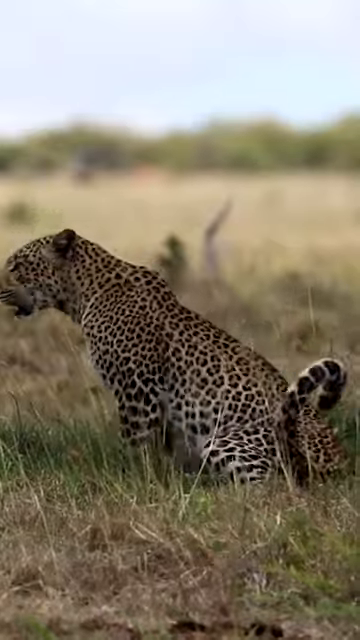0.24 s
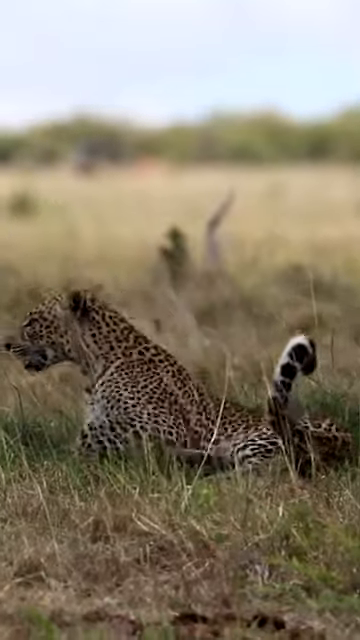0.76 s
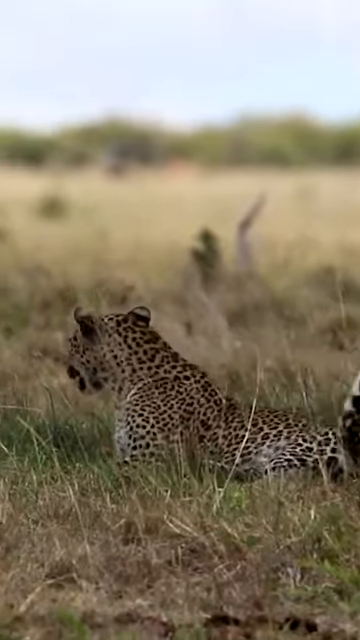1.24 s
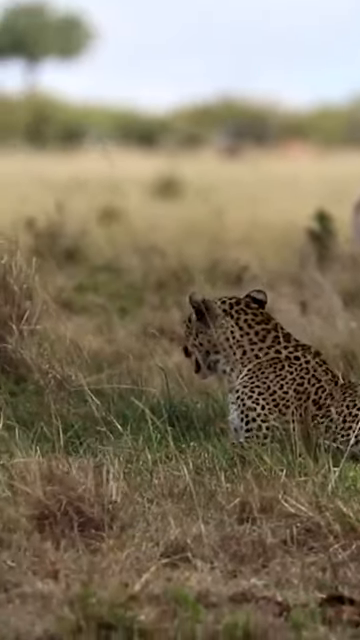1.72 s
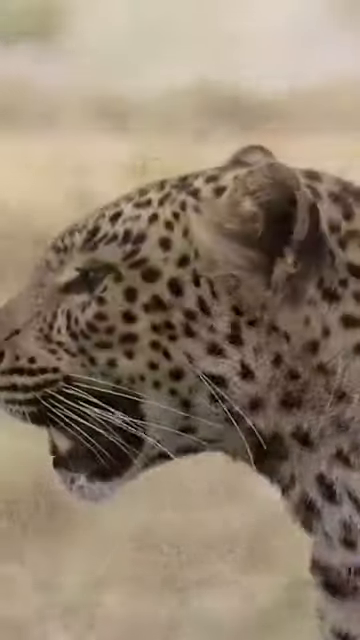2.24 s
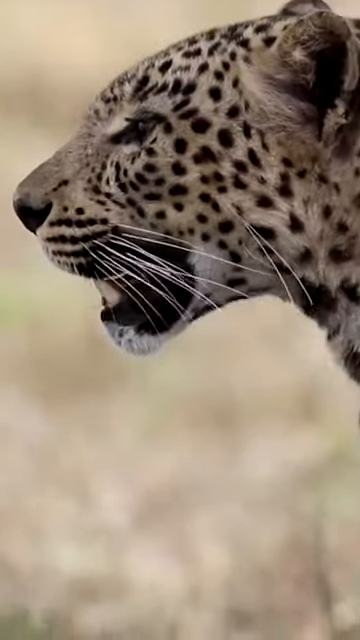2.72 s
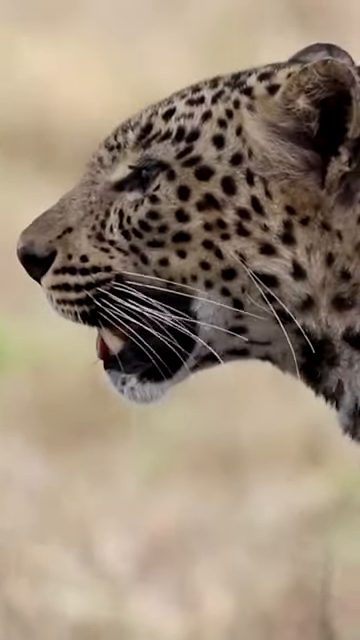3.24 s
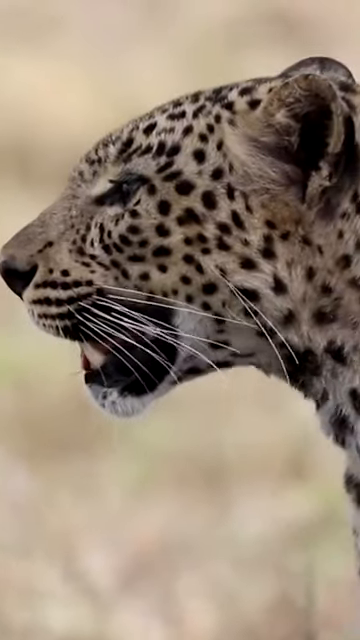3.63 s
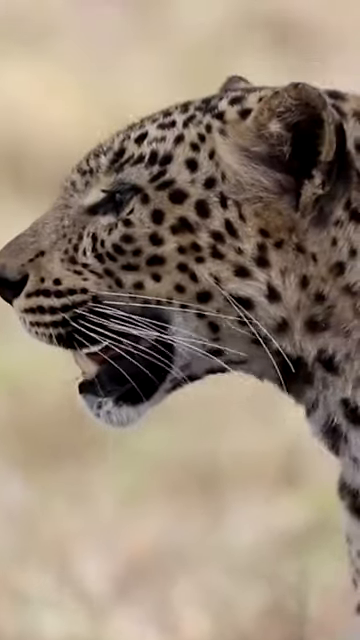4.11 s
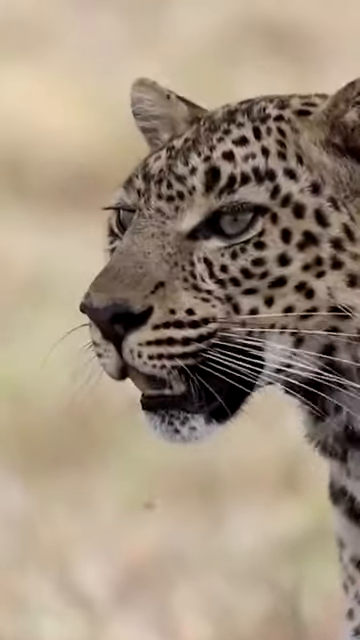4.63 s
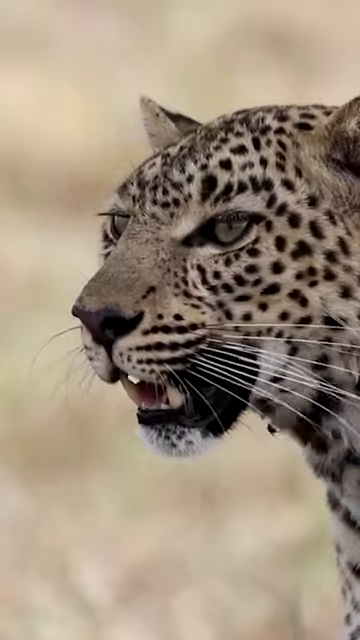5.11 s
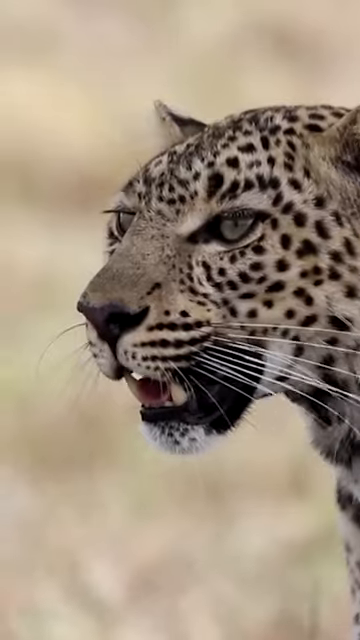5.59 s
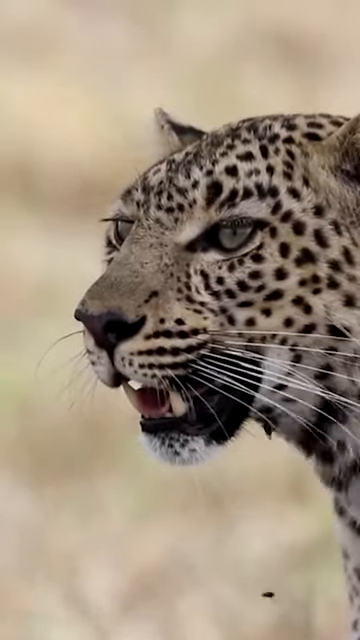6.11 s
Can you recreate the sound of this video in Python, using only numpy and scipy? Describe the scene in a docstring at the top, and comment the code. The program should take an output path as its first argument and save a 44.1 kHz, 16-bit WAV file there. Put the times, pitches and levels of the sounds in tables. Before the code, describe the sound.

A leopard growls low at the start and again late, over faint rumble and hiss, small birds chirping and dry grass ticking in open grassland.

```python
"""Open grassland: a leopard growls twice, slow throat pulses ringing a falling resonance amid thin moans.
Small birds chirp, whistle and tumble in warbled tones with near echoes and a short scattered tail.
Dry stems tick as damped rings with noisy cracks, and a few soft thumps ring low.
Shaped noise makes the low rumble, steady hiss, grass crackle and haze of far birds.
Before the middle the whole sound drops out abruptly, then swells back."""
import sys
import numpy as np
from scipy import signal
from scipy.fft import rfft, irfft
from scipy.io import wavfile
from scipy.ndimage import uniform_filter1d

SR = 44100
rng = np.random.default_rng(int(sys.argv[2]) if len(sys.argv) > 2 else 0)


def store_wav(level_fs):
    """Save 16-bit WAV to argv[1]."""
    pcm = np.round(np.clip(np.atleast_2d(level_fs), -1, 1) * 32767)
    wavfile.write(sys.argv[1], SR, pcm.T.astype(np.int16))


N = 280035  # samples

# Growls, with the swell of the low rumble around each: (time [s], rise [dB])
GROWL_TIMES = [(-.038, 3), (4.8, 2.5)]


def undb(db):
    """Decibels to gain."""
    return 10 ** (np.asarray(db) / 20)


def envelope(t, attack, hold, release):
    """Rise from 0 to 1, hold, fall back to 0."""
    return np.clip(np.minimum(t / attack, 1 - (t - attack - hold) / release), 0, 1)


def clock(seconds):
    """Sample times of a stretch of sound."""
    return np.arange(int(seconds * SR)) / SR


def add(out, start, x):
    """Mix x into out from a start time, trimming whatever falls outside."""
    i = int(round(start * SR))
    x, i = x[max(-i, 0):], max(i, 0)
    out[i:i + len(x)] += x[:max(len(out) - i, 0)]


def walk(rate, size):
    """Smooth random wandering with a spread near 1, from rate fresh values a second."""
    k = int(SR / rate)
    steps = np.repeat(rng.standard_normal(size // k + 1), k)
    smooth = uniform_filter1d(uniform_filter1d(steps, k), k)
    return 1.535 * smooth[:size]


def colour(x, spectrum):
    """Give x a spectrum of (frequency [Hz], level [dB]) points, at rms 1."""
    hz, db = np.transpose(spectrum)
    f = np.maximum(np.fft.rfftfreq(len(x), 1 / SR), 1)
    shape_db = np.interp(np.log(f), np.log(hz), db)
    y = irfft(rfft(x) * undb(shape_db), len(x))
    return y / y.std()


def ring(hz, modes):
    """Damped resonances after a soft push: each swells, then dies away."""
    t = clock(.06)
    out = np.zeros(len(t))
    for multiple, db, swell in modes:
        swell_and_fade = t / swell * np.exp(1 - t / swell)  # peaks at 1
        out += undb(db) * swell_and_fade * np.sin(2 * np.pi * hz * multiple * t)
    return out


def grassland(flutter_db=1.5, waver_db=1.17, rustle_db=-66, chorus_db=-63, chorus_swell_db=3):
    """Wavering shaped noise makes rumble, hiss and far birds; sparse random grains make the grass crackle."""
    # Low rumble: (frequency [Hz], relative density [dB per Hz])
    rumble_spectrum = [(20, -36), (38, -22), (51, -5.5), (63, -13.5), (84, 2), (102, -4), (135, 0),
                       (190, -1.5), (260, -6.5), (350, -12), (500, -20.5), (750, -37.5), (1500, -49)]
    # Steady hiss: (frequency [Hz], relative density [dB per Hz])
    hiss_spectrum = [(200, -3.5), (600, -0.5), (900, 2), (1600, 2), (3200, 0), (4100, -6), (5200, -4),
                     (6900, -4), (7500, -12.5), (10200, -17.5), (10600, -10), (13500, -9.5), (16000, -20)]
    rumble_db, hiss_db = -51.5, -55  # rumble level away from the growls
    lead_s, hold_s, release_s = 1.5, 1.28, 0.15  # the rumble fills out ahead of each growl
    t = np.arange(N) / SR
    fuller_db = np.zeros(N)
    for start, rise_db in GROWL_TIMES:
        fuller_db += rise_db * envelope(t - start + lead_s, lead_s, hold_s, release_s)
    rumble = colour(rng.standard_normal(N), rumble_spectrum)
    rumble = rumble * undb(rumble_db + fuller_db + flutter_db * walk(20, N))
    hiss = colour(rng.standard_normal(N), hiss_spectrum) * undb(hiss_db + waver_db * walk(12, N))
    grains = (rng.random(N) < 60 / SR) * rng.standard_normal(N)  # about 60 a second
    rustle = colour(grains, [(300, -3), (1000, 4), (2500, 2.0), (6500, -11.5), (8000, -32), (15000, -40)])
    chorus = colour(rng.standard_normal(N), [(4000, -31), (5100, 3.5), (6000, -2), (6900, 2.5), (7700, -44)])
    chorus = chorus * undb(chorus_db + chorus_swell_db * walk(5.9, N))
    return rumble + hiss + undb(rustle_db) * rustle + chorus


def growl(jitter=0.0077, scatter_db=0.6, rasp_db=-24):
    """Slack vocal folds slap open about forty times a second; each slap rings the throat and lets out a rasp."""
    # Throat resonances: (multiple of the lowest [ratio], level [dB], time to swell [s])
    throat = [(1, 1.5, 0.0056), (2.1, -19, 0.0026), (2.9, -26, 0.005), (4.9, -21.5, 0.0014)]
    # The folds slacken as a growl goes on: pulses slow down and the resonance sinks
    first_pulse_s, pulse_hz, pulse_sag_hz_per_s, slack_pulse_hz = .0325, 40.7, 23.1, 35.8
    tense_throat_hz, slack_throat_hz, relax_s = 290, 174.7, 0.055
    # A loud push, then a soft rattle that dies away
    push_db, attack_s, push_hold_s, push_release_s = -32, 0.068, 0.12, 0.082
    rattle_db, rattle_release_s = -43.5, 0.34
    rattle_hold_s = push_hold_s + push_release_s
    out, s = np.zeros(SR), first_pulse_s
    for late, size in rng.standard_normal((22, 2)):
        age = s - first_pulse_s
        hz = slack_throat_hz + (tense_throat_hz - slack_throat_hz) * np.exp(-age / relax_s)
        push = undb(push_db) * envelope(s, attack_s, push_hold_s, push_release_s)
        rattle = undb(rattle_db) * envelope(s, attack_s, rattle_hold_s, rattle_release_s)
        add(out, s, max(push, rattle) * undb(scatter_db * size) * ring(hz, throat))
        s += (1 + jitter * late) / max(pulse_hz - pulse_sag_hz_per_s * age, slack_pulse_hz)
    rasp_spectrum = [(100, -27), (450, 21), (950, 0), (1400, -20), (3000, -14), (8000, -60)]
    rasp = colour(rng.standard_normal(len(out)), rasp_spectrum)
    loudness = np.abs(signal.hilbert(out))  # the rasp follows the pulses
    return out + undb(rasp_db) * loudness * rasp


def moan(jitter=0.0064, shimmer_db=0.05, half_db=-12, waver_db=1.04):
    """Wavering notes open the growl and linger after it, with a rough undertone and a separate whine above."""
    # Notes, timed from the growl's start:
    # (time [s], attack [s], hold [s], release [s], pitch [Hz], level [dB])
    notes = [(0.011, 0.0216, 0.017, 0.032, 259, -38.5), (0.194, 0.11, 0.393, 0.12, 251.8, -48.5),
             (0.797, .09, .19, .2, 261, -46.5), (1.12, 0.02, .008, .03, 249.7, -44)]
    # Thin whine, timed from the growl's start: (time [s], pitch [Hz], level [dB])
    whine = [(.02, 345, -55.5), (.08, 595, -61), (.26, 520, -60), (.3, 450, -67.5), (.55, 410, -66.5),
             (.76, 355, -61), (1.04, 468, -66), (1.14, 450, -62.5), (1.25, 420, -95)]
    swell_db_per_s = 21.5  # up to the end of a note's hold
    sag_hz_per_s = 232  # while a note fades
    t = clock(1.8)

    def turn(hz):
        """Phase of an unsteady pitch."""
        return 2 * np.pi * np.cumsum(hz * (1 + jitter * walk(69.9, len(t)))) / SR

    whine_s, whine_hz, whine_db = np.transpose(whine)
    voice = undb(np.interp(t, whine_s, whine_db)) * np.sin(turn(np.interp(t, whine_s, whine_hz)))
    for start, attack, hold, release, hz, db in notes:
        past_peak = t - start - attack - hold
        phase = turn(hz - sag_hz_per_s * np.clip(past_peak, 0, release))
        undertone = undb(half_db) * walk(39.77, len(t)) * np.sin(phase / 2)  # an octave below
        gain = undb(db + swell_db_per_s * np.minimum(past_peak, 0))
        gain = gain * envelope(t - start, attack, hold, release)
        voice = voice + gain * (np.sin(phase) + undertone)
    unsteady_db = shimmer_db * walk(81.4, len(t)) + waver_db * walk(17.54, len(t))
    return np.sqrt(2) * voice * undb(unsteady_db)  # sqrt(2): table levels are rms


def syrinx(hz, gain, waver, flutter_db, octave_db=-21):
    """A bird's fluttering whistle on a pitch curve, with a faint octave."""
    size = len(hz)
    phase = 2 * np.pi * np.cumsum(hz * (1 + waver * walk(500, SR)[:size])) / SR
    tone = np.sin(phase) + undb(octave_db) * np.sin(2 * phase)
    flutter = undb(flutter_db * walk(350, SR)[:size])
    return gain * flutter * signal.windows.tukey(size, .25) * tone


def chirp(length, peak_s, centre_hz, place):
    """The pitch swings down and up at a steady pace while the call swells and fades."""
    swing_s, swing_share = .041, .18  # period; swing as a share of the centre pitch
    swell_db_per_s, fade_db_per_s = 236, 220
    t = clock(length)
    hz = centre_hz * (1 - swing_share * np.cos(2 * np.pi * (t / swing_s + place)))
    db = np.minimum(swell_db_per_s * (t - peak_s), fade_db_per_s * (peak_s - t))
    return syrinx(hz, undb(db), waver=0.0346, flutter_db=2)


def birds(scatter_db=-14, scatter_s=0.023):
    """Calls beat against their own near echoes; grass and bushes scatter a short tail after them."""
    # Warbled chirps; the place in the pitch swing counts from its bottom:
    # (time [s], length [s], loudest after [s], level [dB], centre pitch [Hz], starting place [cycles])
    chirp_calls = [(0.142, .052, 0.011, -50.5, 6130, -.22), (.448, 0.034, .017, -49, 6250, -.38),
                   (.838, 0.017, .004, -51, 6100, 0.13), (.951, 0.011, .004, -50, 5900, 0.06),
                   (1.007, 0.033, .017, -52.5, 6300, -0.45), (1.178, 0.037, .017, -51, 6330, -0.37),
                   (1.396, 0.033, .017, -50, 6500, -0.4), (1.726, .012, .004, -54, 5800, -0.037),
                   (1.755, .031, .017, -57, 6460, -0.39), (1.951, 0.03, .017, -49, 6630, -0.41),
                   (2.483, 0.078, 0.047, -42, 6860, 0.21), (2.934, 0.08, 0.063, -39.5, 6850, .15),
                   (3.518, .031, .017, -51.5, 6700, -0.39), (3.566, 0.011, .004, -51, 5200, .08),
                   (3.894, 0.061, 0.056, -43, 6230, .07), (4.021, .012, .004, -51.5, 5700, 0.054),
                   (4.17, .084, 0.048, -39, 6550, 0.0021), (4.666, 0.016, .004, -48, 6100, 0.018),
                   (4.979, 0.05, 0.011, -49, 6000, -0.14), (5.287, 0.034, .017, -49.5, 6280, -0.37),
                   (5.676, 0.01, .004, -50, 5500, 0.13), (5.789, 0.011, .004, -53, 5800, 0.015),
                   (5.846, 0.026, 0.014, -55, 6600, -.38), (6.016, 0.039, 0.015, -49.5, 6300, -0.41),
                   (6.051, 0.04, .017, -56, 5400, -0.24), (6.234, .031, 0.02, -49.5, 6620, -0.34)]
    # Rising whistles: (time [s], level [dB], starting pitch [Hz])
    whistle_calls = [(.409, -49.5, 5670), (1.963, -49, 5500), (3.157, -48.5, 5540), (4.74, -45, 5540),
                     (5.246, -48.5, 5730)]
    # Lower tumbling calls: (time [s], level [dB])
    tumble_calls = [(2.352, -45), (2.675, -44)]
    # Near echoes of every call: (delay [s], level [dB])
    near_echoes = [(.0052, -6.5), (0.0142, -8.5)]
    calls = np.zeros(N)
    for start, length, peak_s, db, hz, place in chirp_calls:
        add(calls, start, undb(db) * chirp(length, peak_s, hz, place))
    for start, db, hz in whistle_calls:
        add(calls, start, undb(db) * whistle(hz))
    for start, db in tumble_calls:
        add(calls, start, undb(db) * tumble())
    out = calls.copy()
    for delay, echo_db in near_echoes:
        add(out, delay, undb(echo_db) * calls)
    t = clock(.3)
    tail = rng.standard_normal(len(t)) * np.exp(-t / scatter_s)
    tail = tail / np.linalg.norm(tail)
    return out + undb(scatter_db) * signal.fftconvolve(out, tail)[:N]


def whistle(start_hz):
    """A clean, swelling upward glide."""
    length_s, rise_hz_per_s, swell_db_per_s = .053, 25000, 90
    t = clock(length_s)
    gain = undb(swell_db_per_s * (t - length_s))
    return syrinx(start_hz + rise_hz_per_s * t, gain, waver=0.0083, flutter_db=1.8)


def ticks(ring_s=0.0024, crack_s=0.005):
    """Dry stems snap with a brief damped ring and a burst of noise."""
    # Ticks: (time [s], level [dB], ring [Hz], crack relative to the ring [dB])
    snaps = [(.721, -46, 1630, 4), (.974, -34.5, 1348, -24), (1.103, -42.5, 950, -9), (1.42, -48, 1490, -5),
             (1.569, -51, 1150, -8), (1.787, -43, 1110, -19), (1.851, -41, 1400, -6),
             (1.995, -40.5, 2820, -8), (3.901, -49, 1880, -5), (4.295, -44.5, 2150, -1.5),
             (5.559, -44.5, 1650, 2.5), (5.812, -35.5, 1340, -19), (5.906, -48, 1430, -2),
             (5.941, -43, 947, -5.5)]
    crack_spectrum = [(300, -27), (900, -1), (2400, -1.5), (4000, -11), (12000, -26)]
    out, t = np.zeros(N), clock(0.016)
    for start, db, hz, crack_db in snaps:
        crack = colour(rng.standard_normal(len(t)), crack_spectrum) * np.exp(-t / crack_s)
        stem = np.sin(2 * np.pi * hz * t) * np.exp(-t / ring_s)
        add(out, start, undb(db) * (undb(crack_db) * crack - stem))
    return out


def tumble():
    """A broken call falls about an octave; its warble settles as it lands."""
    top_hz, bottom_hz, fall_hz_per_s = 4616, 2420, 28500
    swing_s, swing_share, settle_s = .034, 0.221, .06
    attack_s, hold_s, release_s = 0.017, .062, .045
    t = clock(attack_s + hold_s + release_s)
    centre = np.maximum(top_hz - fall_hz_per_s * t, bottom_hz)
    swing = swing_share * np.exp(-t / settle_s) * np.sin(2 * np.pi * t / swing_s)
    hz = np.minimum(centre * (1 + swing), top_hz)
    return syrinx(hz, envelope(t, attack_s, hold_s, release_s), waver=0.05, flutter_db=3.0)


def thumps():
    """Soft thumps ring low in a few damped resonances."""
    # Thumps: (time [s], level [dB], lowest ring [Hz])
    soft_knocks = [(3.216, -30, 263), (3.252, -38.5, 263), (4.655, -38, 169)]
    # Resonances of a thump: (multiple of the lowest [ratio], level [dB], time to swell [s])
    thud = [(1, 1.5, .0035), (1.85, -8, 0.0038), (3.1, -11.5, 0.002), (5, -22, 0.0011)]
    out = np.zeros(N)
    for start, db, hz in soft_knocks:
        add(out, start, undb(db) * ring(hz, thud))
    return out


def scene():
    """The leopard amid birds, ticking grass, thumps and the grassland's rumble and hiss."""
    out = grassland() + birds() + ticks() + thumps()
    for start, _ in GROWL_TIMES:
        add(out, start, growl())
        add(out, start, moan())
    return out[None]


def record(dry):
    """The level drops out at once and creeps back; a steep low-pass removes the top treble."""
    drop_at_s, drop_fall_s, drop_db = 2.441, 0.0068, -33
    recover_s, recover_bend = 0.9, 1.144  # a bend above 1 starts the return gently
    top_hz = 15700
    since = np.arange(N) / SR - drop_at_s
    fallen = undb(drop_db * np.clip(since / drop_fall_s, 0, 1))
    back = (1 - np.exp(-np.maximum(since - drop_fall_s, 0) / recover_s)) ** recover_bend
    gain = fallen + (1 - fallen) * back
    low_pass = signal.ellip(10, .2, 70, top_hz, fs=SR, output="sos")
    return signal.sosfilt(low_pass, dry * gain)


dry = scene()
out = record(dry)
store_wav(out)
```